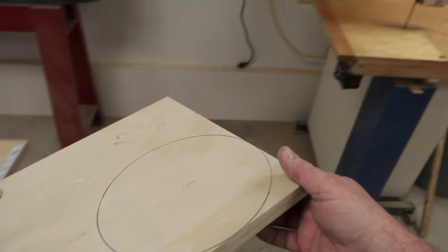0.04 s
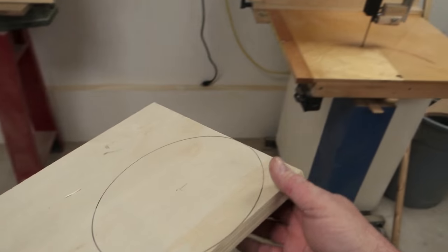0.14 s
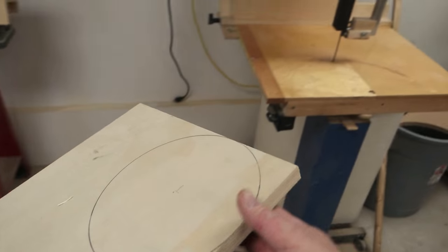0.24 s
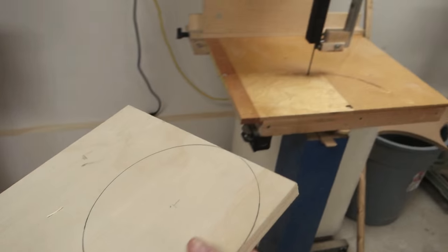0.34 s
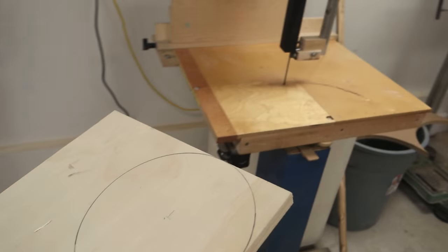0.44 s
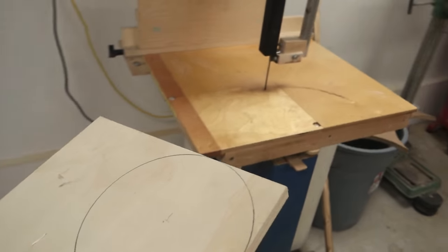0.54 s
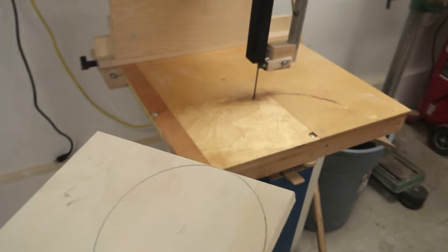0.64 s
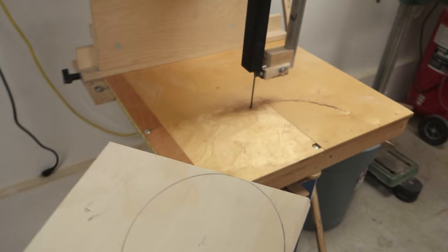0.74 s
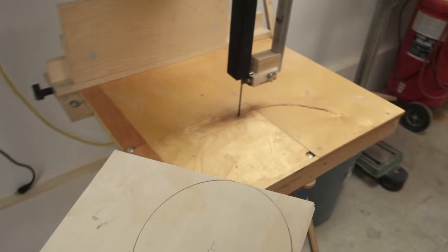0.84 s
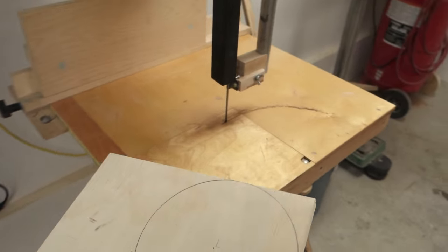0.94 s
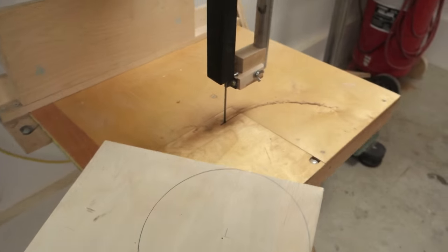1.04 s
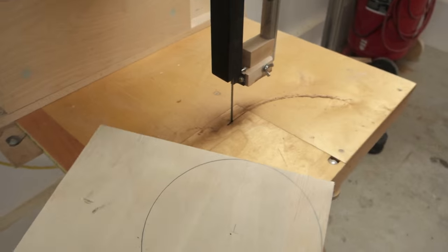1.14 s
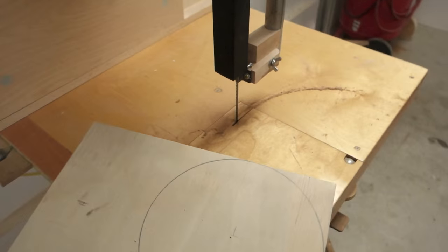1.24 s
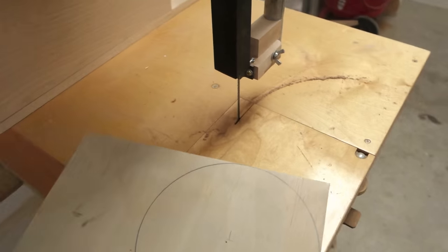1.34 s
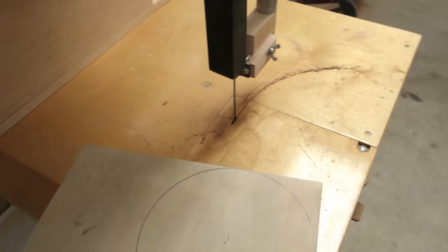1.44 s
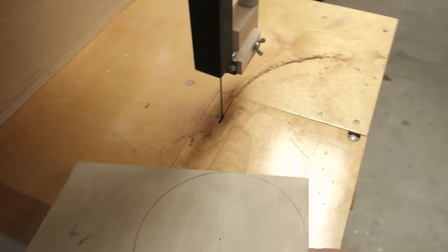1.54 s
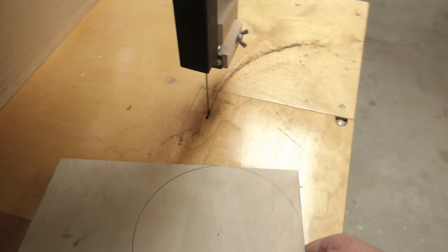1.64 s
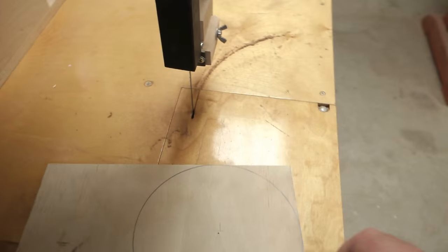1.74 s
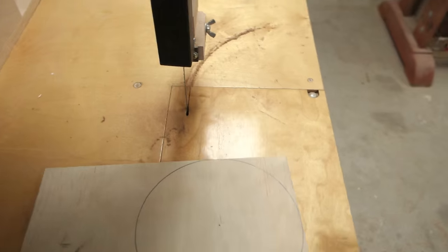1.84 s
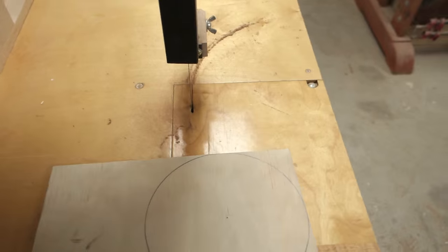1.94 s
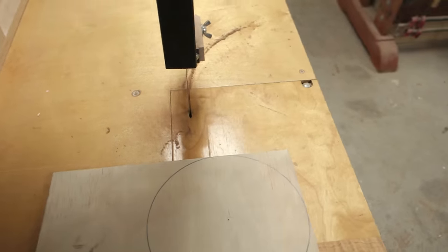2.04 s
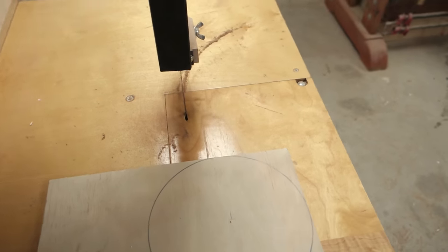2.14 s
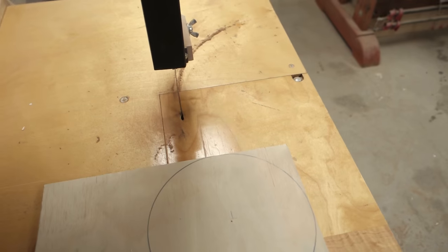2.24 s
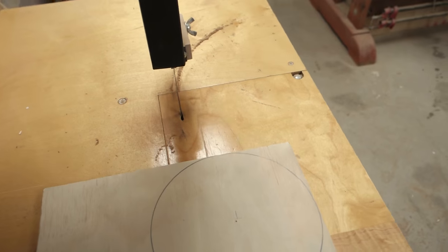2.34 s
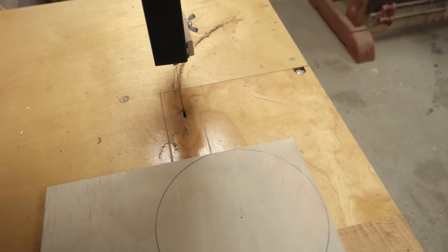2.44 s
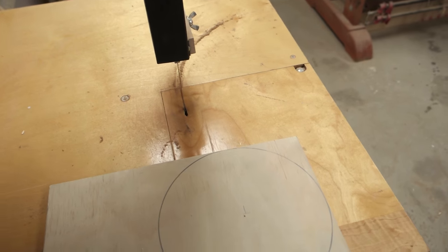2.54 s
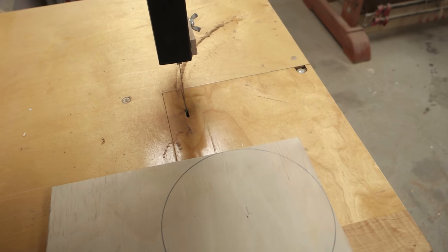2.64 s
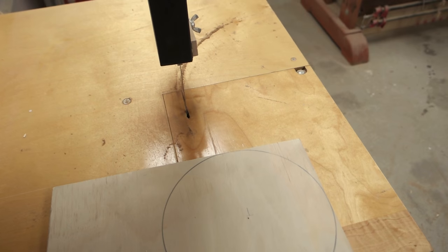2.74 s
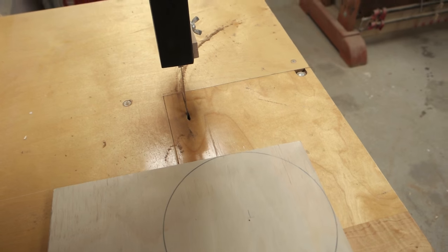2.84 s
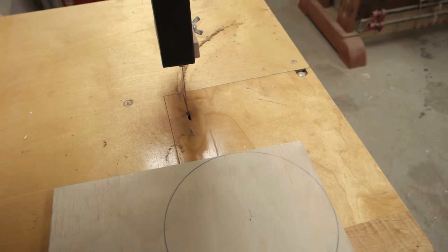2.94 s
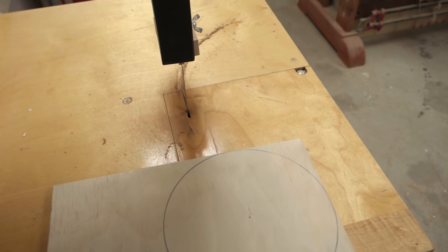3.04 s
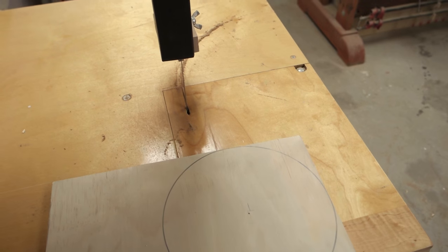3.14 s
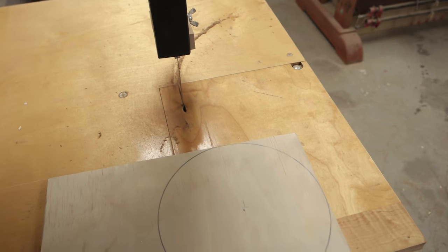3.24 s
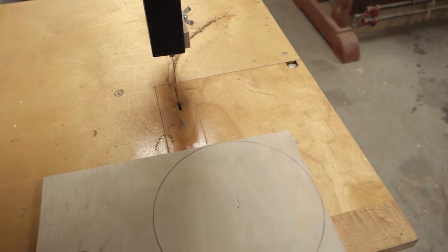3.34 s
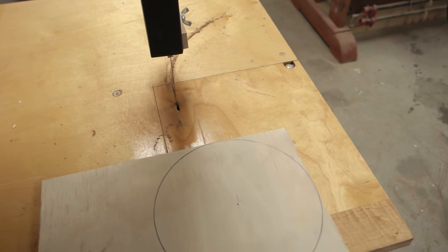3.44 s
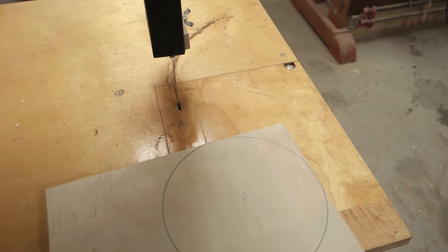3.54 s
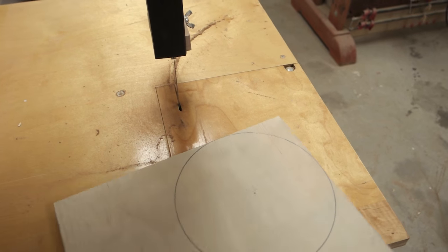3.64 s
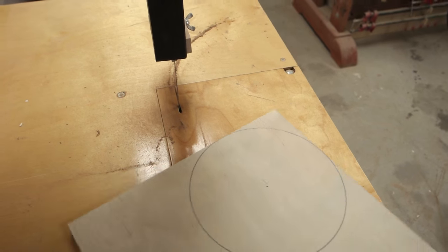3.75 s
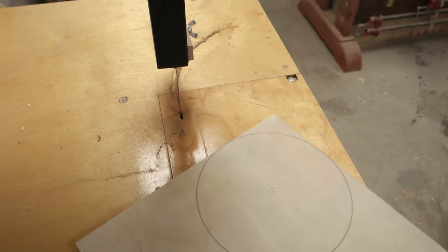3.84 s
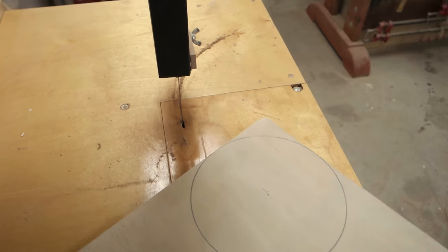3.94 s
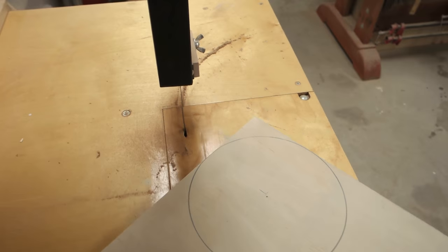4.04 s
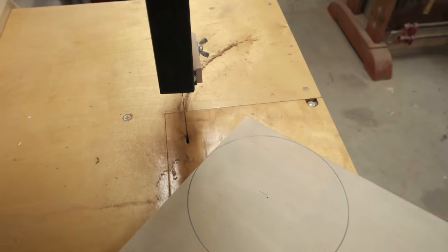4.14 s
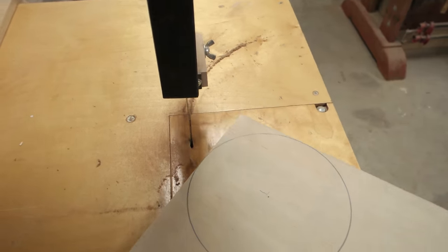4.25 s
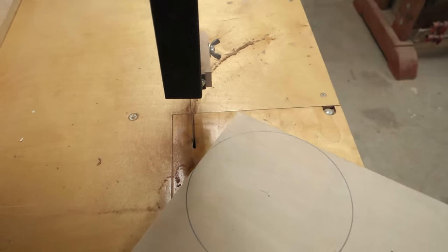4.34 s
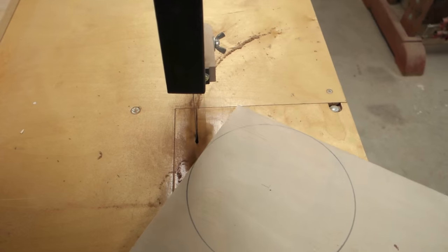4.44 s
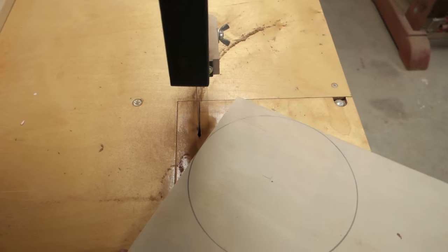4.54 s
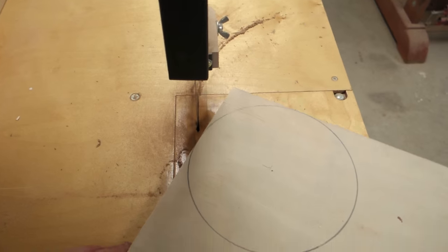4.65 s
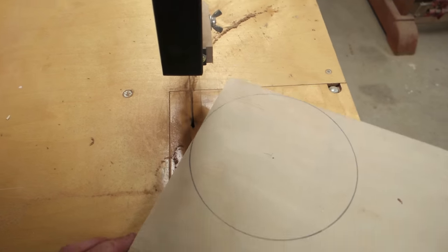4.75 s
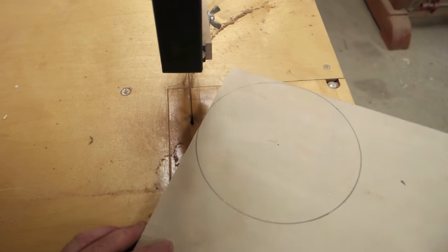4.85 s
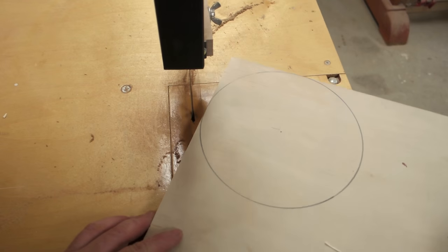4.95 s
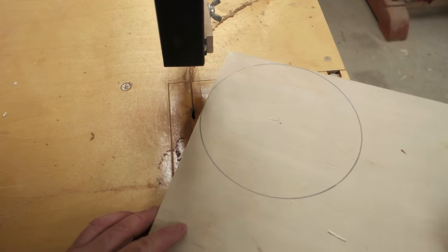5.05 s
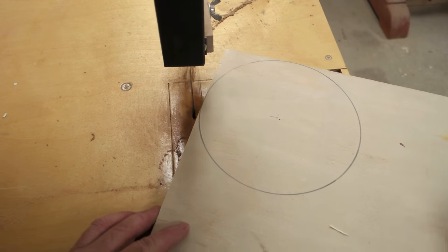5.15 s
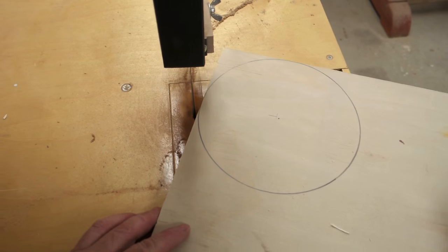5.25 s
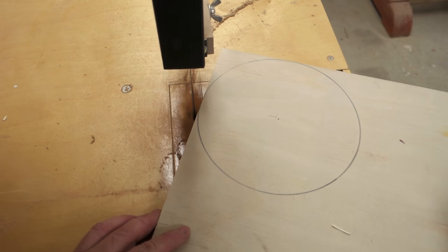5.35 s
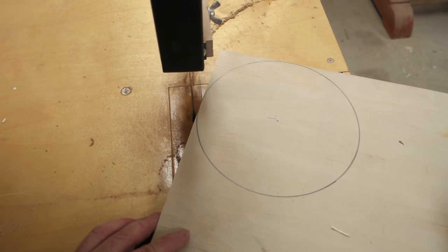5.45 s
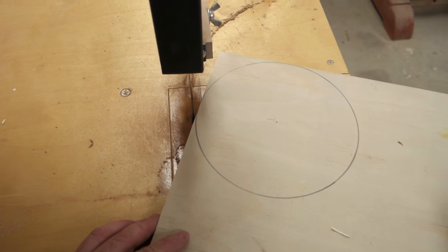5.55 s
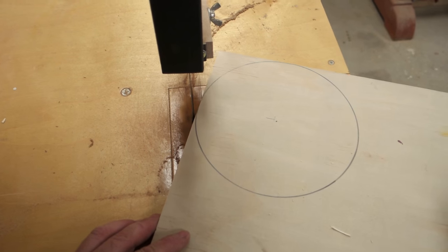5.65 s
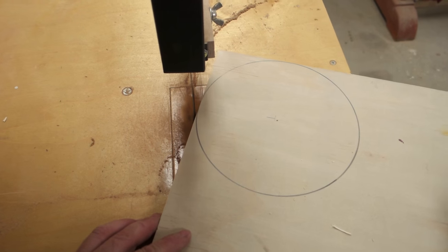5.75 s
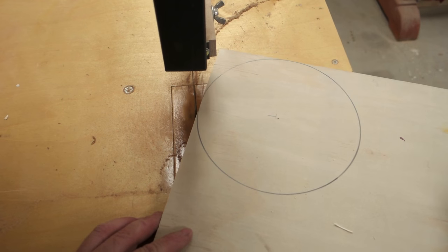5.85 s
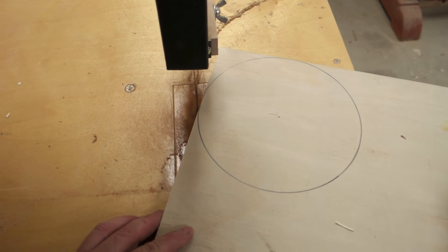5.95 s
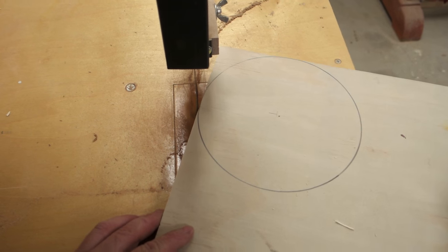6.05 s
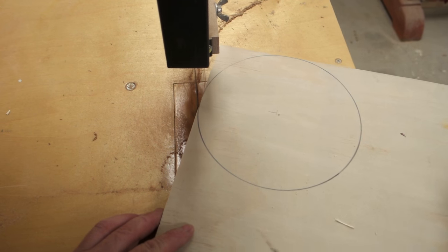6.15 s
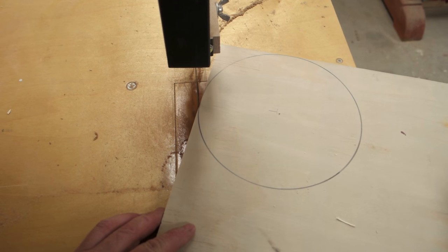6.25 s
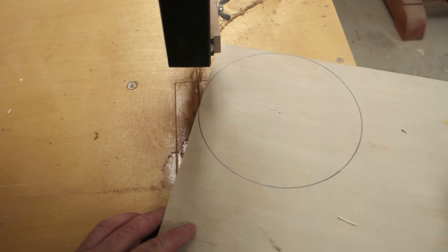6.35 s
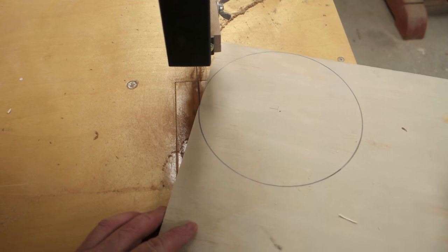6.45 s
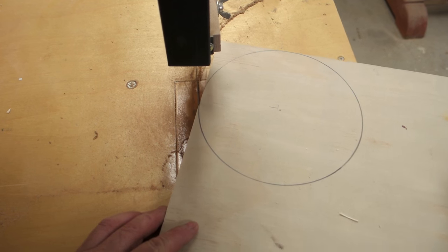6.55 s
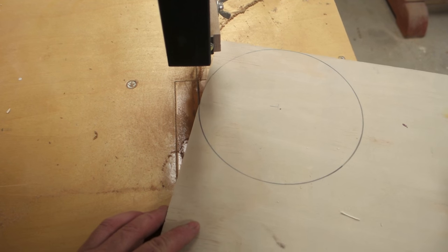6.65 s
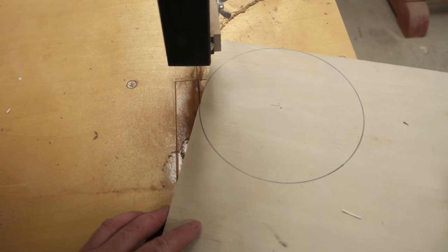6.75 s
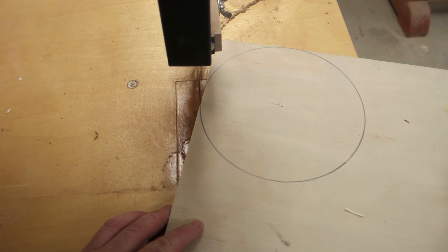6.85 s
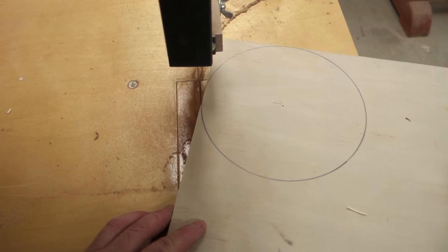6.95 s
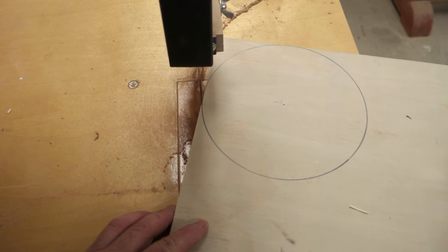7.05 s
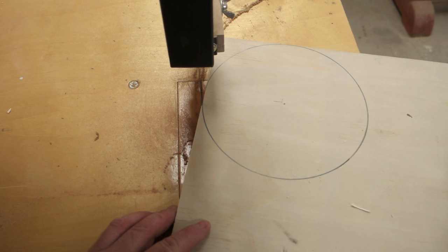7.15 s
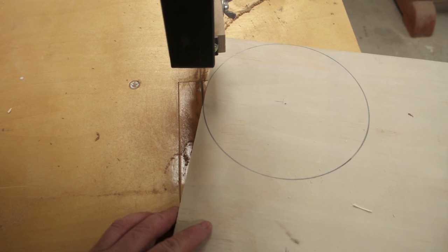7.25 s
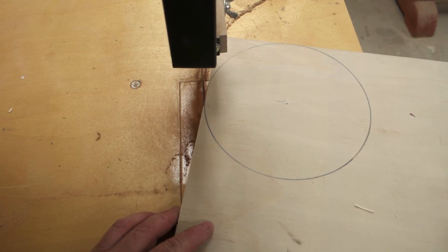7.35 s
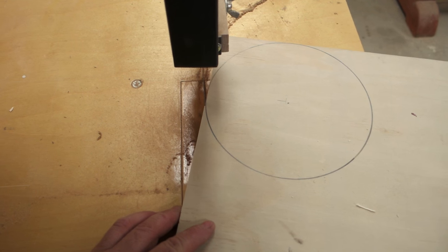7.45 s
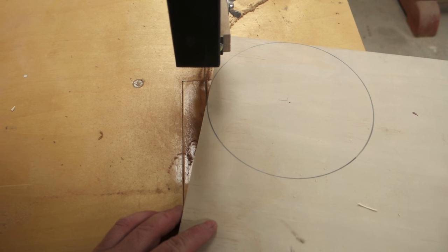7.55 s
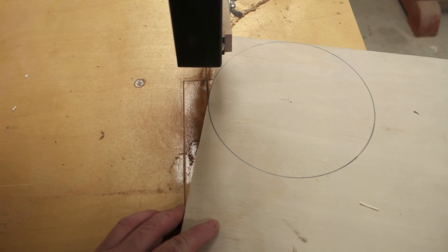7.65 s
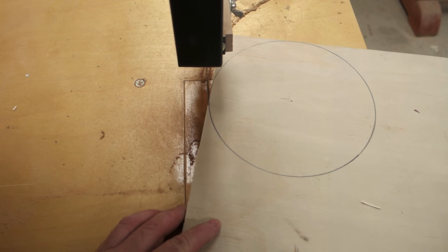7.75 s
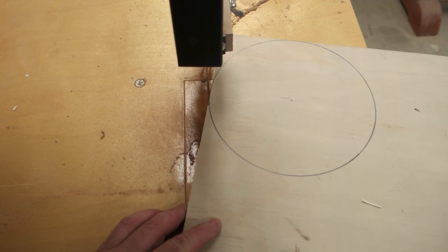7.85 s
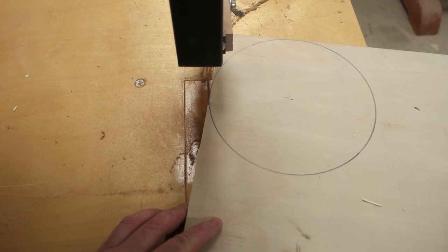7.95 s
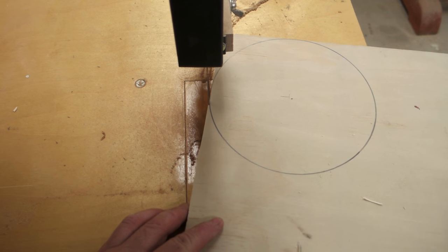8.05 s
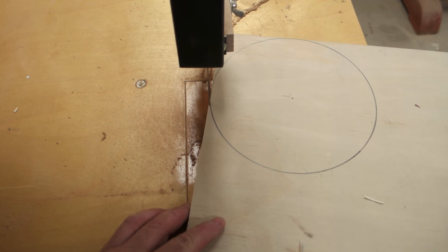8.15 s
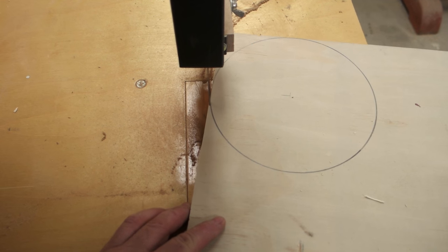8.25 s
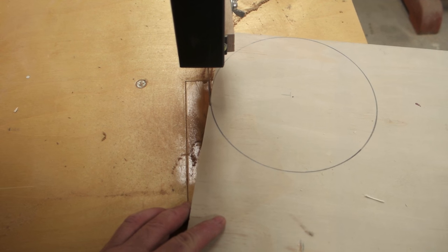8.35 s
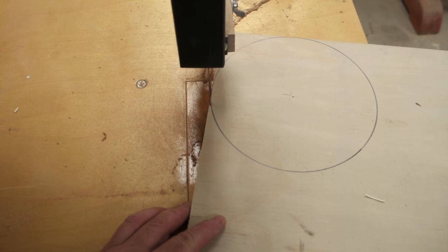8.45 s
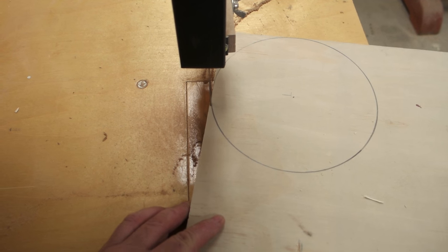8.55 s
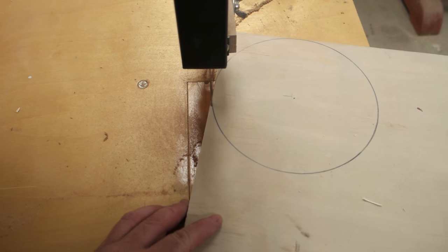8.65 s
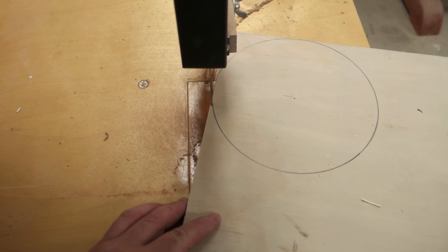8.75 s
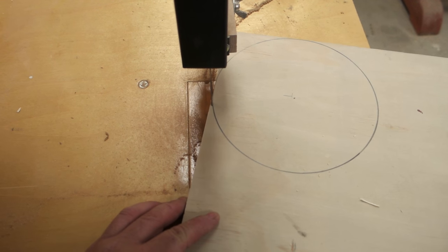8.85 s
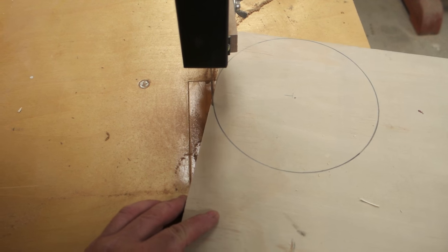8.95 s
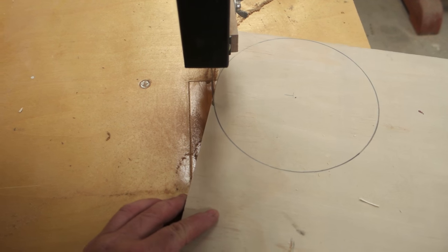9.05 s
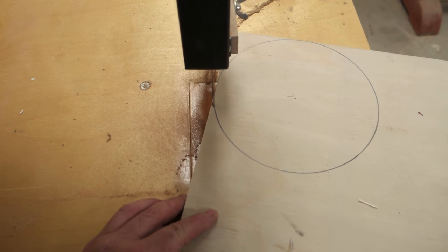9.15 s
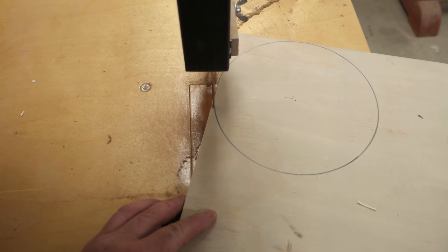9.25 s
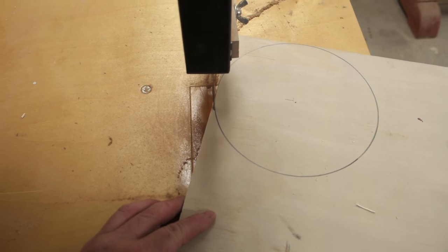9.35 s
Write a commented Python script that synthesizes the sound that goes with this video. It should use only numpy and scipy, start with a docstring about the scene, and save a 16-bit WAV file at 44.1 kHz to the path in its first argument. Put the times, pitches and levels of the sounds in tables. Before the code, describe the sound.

In a small workshop, close and nearly mono, a hand softly rubs a plywood board. It clacks onto a wooden table, slides and settles. A switch snaps, a motor shudders and climbs to speed, and the band saw rumbles and hisses with a regular brushing pulse. Then teeth rasp into wood and a high, slightly rough whine swells strongly before easing a little.

```python
"""A plywood board is rubbed and bumped (filtered noise), knocks on a band saw's table (struck modes), slides
and settles. The switch snaps (struck modes), the motor shudders up to speed (drifting sines), and the free
blade runs with rumble, rattle and hiss (shaped noise), its weld brushing the guides once a lap. Then the teeth
bite: tooth-gated noise rasps, multiples of the tooth beat whine, blade modes ring and squeal. A small workshop
answers the knocks and the switch; the two channels differ only faintly."""
import sys
import numpy as np
from scipy import signal
from scipy.fft import rfft, irfft, next_fast_len
from scipy.io import wavfile
from scipy.ndimage import uniform_filter1d, map_coordinates

SR = 44100
rng = np.random.default_rng(int(sys.argv[2]) if len(sys.argv) > 2 else 0)


def master(y):
    """Save y as 16-bit WAV."""
    cut = np.clip(np.atleast_2d(y).T, -1, 1)
    pcm = np.round(cut * 32767)  # scale
    wavfile.write(sys.argv[1], SR, pcm.astype(np.int16))


N = 414099

# Still air of the shop. Each row: frequency in Hz, relative level in dB per Hz.
STILL_AIR_SPECTRUM = [(12, -35), (20, 0.5), (64, 1.5), (353, -9.5), (599, -15), (770, -9), (910, -15.5),
                      (1680, -21.5), (6060, -27), (14400, -34), (15600, -32)]
# Workshop reverberation. Each row: frequency in Hz, t60 in seconds.
SHOP_T60 = [(100, 0.56), (500, 0.5), (2000, 0.48), (10000, 0.32)]

# Strokes of hand and table over the board.
# Each row: start in seconds, length in seconds, hiss in dB, board tone in dB (both before a common trim).
STROKES = [(0.0, 0.23, -68, -71.5), (0.247, 0.21, -64, -85), (0.52, 0.21, -64.5, -67),
           (1.057, 0.06, -62, -65), (1.15, 0.31, -73, -74), (1.472, 0.53, -65.5, -63),
           (1.907, 0.14, -50.5, -55), (1.994, 0.18, -49, -61), (2.257, 0.065, -65, -58.5),
           (2.519, 0.13, -71.5, -68), (2.757, 0.13, -73.5, -69.5), (3.006, 0.3, -74.5, -68.5)]
# Board edge scuffing in passing. Each row: start in seconds, level in dB.
SCUFFS = [(1.081, -58.5), (1.156, -55)]
# Wood grain sliding. Each row: frequency in Hz, relative level in dB per Hz.
GRAIN_SPECTRUM = [(880, -18), (1500, -7.5), (2120, -7), (2430, -7), (3120, -7), (3400, -6.5), (5950, -7),
                  (12100, -24), (15000, -43)]
# Colours of a hand on the veneer. Each row: frequency in Hz, half width in Hz, relative level in dB.
VENEER_MODES = [(1480, 30, 5), (2510, 200, -2), (3590, 120, -3), (4670, 110, -0.5), (5760, 170, -1)]
# Board sounding as it is rubbed. Each row: frequency in Hz, half width in Hz, relative level in dB.
RUBBED_BOARD_MODES = [(310, 55, 0.5), (506, 43, -5), (622, 24, 8.5), (875, 45, 1.5), (1187, 50, 1),
                      (1390, 36, -0.5), (1710, 80, -15.5), (2160, 30, -5.5), (2320, 40, -5), (2540, 40, -3),
                      (2740, 20, -5.5), (2970, 30, -2)]
# Fingers shift and bump the board. Each row: start in seconds, level in dB.
BUMPS = [(0.137, -58), (0.504, -59), (0.544, -60), (0.609, -61), (0.754, -59), (1.367, -65), (2.6, -60),
         (3.13, -63)]
# Board edge singing in one range of its modes.
# Each row: middle in seconds, half length in seconds, level in dB, centre in Hz.
EDGE_SCRAPES = [(1.184, .03, -59, 1810), (1.52, 0.09, -65, 1880), (2.309, 0.031, -61.5, 2940)]

# Board meeting the table; softer contacts are duller. Each row: start in seconds, level in dB,
# thud and crack in dB relative to it (before trims), tilt in dB per octave, flatness (0 corner, 1 flat).
KNOCKS = [(1.631, -28.5, -22.5, -32, -6, 0.25), (1.763, -17.5, -29, -15.5, -.5, .02),
          (1.781, -19, -25, -10.5, 2, .05), (1.799, -25.5, -20.5, -22, -2, .2),
          (1.918, -15.5, -25, -27, 0, 1), (1.935, -24, -22, -37, -2.5, .75)]
# Board on the table. Each row: frequency in Hz, relative dB on a corner, relative dB flat, t60 in seconds.
STRUCK_BOARD_MODES = [(284.5, 2.5, -3.5, 0.19), (315, -7, -5, 0.14), (349, 0, -4, .14),
                      (386, -5, -7.5, 0.1), (417, -5, -4.5, 0.14), (487, -2.5, -4.5, 0.12),
                      (719, -5, 5, 0.09), (862, -4, 0, 0.12), (931, -7.5, 0, 0.12), (1023, -14, 1, 0.076),
                      (1258, -4.5, -2.5, 0.1), (1360, -1.5, -9, 0.1), (1590, -3.5, -13, 0.12),
                      (1730, -5, -11.5, 0.086), (1900, -7, -14.5, .11), (2080, -12.5, -21.5, 0.081),
                      (2460, -12.5, -15.5, .09), (2685, -10, -19.5, 0.08)]
# Dense higher modes of board and table. Each row: frequency in Hz, relative level in dB per Hz.
CLACK_SPECTRUM = [(130, -26), (220, -4.5), (300, 4.5), (420, 4.5), (600, -6), (750, -4), (1250, -5.5),
                  (1700, -8), (2700, -20.5), (3200, -30), (7000, -39.5), (12000, -75)]

# Power switch. Each row: start in seconds, level in dB.
CLICKS = [(3.217, -28.5)]
# Switch box. Each row: frequency in Hz, relative level in dB, t60 in seconds.
SWITCH_BOX_MODES = [(637, 0, 0.12), (1000, 0, 0.16), (1135, 3, 0.13), (1190, 0, 0.078), (1830, -3, 0.11),
                    (2100, -6, .08), (3540, -2, 0.091), (4170, -10, 0.05)]
# Snap of the switch. Each row: frequency in Hz, relative level in dB per Hz.
SNAP_SPECTRUM = [(240, -35), (400, -1.5), (1160, -11), (3150, -12), (3550, -5), (3830, -17), (7030, -21),
                 (15000, -37)]

# Spin-up. Each row: time in seconds, share of full speed.
SPIN_UP = [(3.22, .3), (3.4, .5), (3.68, .68), (3.85, .85), (4.08, .87), (4.27, 1)]
# Mains hum. Each row: frequency in Hz, dB while starting, dB running,
# dB added by the pull-in surge, dB added by the cut.
MAINS_HUM = [(119, -55, -44, 9, 1.5), (240, -40.5, -44, 12.5, 4)]
# Shaft, pulley and wheel tones. Each row: frequency in Hz, level in dB, both at full speed.
SHAFT_TONES = [(30, -54), (45.5, -62), (64.4, -51.5), (90, -45), (150, -49), (210, -54.5), (303, -48.5),
               (360, -51.5), (373, -53), (392, -57), (486, -55), (543, -53.5)]
# Wheel rumble. Each row: frequency in Hz, relative level in dB per Hz.
RUMBLE_SPECTRUM = [(22, -35), (40, -18), (52, 7), (66, 4.5), (85, 12.5), (105, -4), (135, -2), (175, 1),
                   (220, -8), (400, -71)]
# Rumble swelling as the machine settles. Each row: middle in seconds, half length in seconds, added dB.
RUMBLE_SWELLS = [(4.25, 0.18, 5.5), (5.117, .15, 5)]
# Frame rattle. Each row: frequency in Hz, relative level in dB per Hz.
RATTLE_SPECTRUM = [(110, -61), (180, -10.5), (239, -2), (307, -2), (334, -10), (371, -5.5), (541, -6),
                   (600, -8.5), (710, -6), (884, -13), (2200, -25.5), (2860, -34), (4840, -120)]
# Blade hiss in its guides. Each row: frequency in Hz, relative level in dB per Hz.
GUIDE_SPECTRUM = [(880, -8.5), (1500, -0.5), (1580, -10.5), (1770, -1.5), (2240, -4), (2450, -3.5),
                  (3160, -7), (3840, -9.5), (4200, -11), (5310, -4), (7270, -11), (8930, -17), (12600, -19),
                  (14600, -35), (15600, -23)]
# Free blade in its guides. Each row: frequency in Hz, half width in Hz, relative level in dB.
GUIDE_MODES = [(1008, 10, 6.5), (1231, 10, 5.5), (1747, 17, 4.5), (2100, 12, 2), (2320, 28, 0),
               (2470, 7.9, 7), (2522, 9, 6.5), (2606, 30, -1.5), (2864, 23, -4), (3820, 39, 0),
               (5300, 24, 2), (5485, 50, 0.5)]
# Short bursts of rattle and hiss while the blade runs free, most near weld passes.
# Each row: middle in seconds, half length in seconds, rattle in dB, hiss in dB.
FREE_RUN_BURSTS = [(3.87, 0.085, -62, -48), (4.533, 0.02, -49, -58), (5.026, 0.025, -40, -53),
                   (5.455, .02, -45, -55), (5.698, .02, -44, -52)]

# Tooth rate at full speed, sagging under the cut. Each row: time in seconds, teeth per second.
TOOTH_RATE = [(6.3, 822), (6.4, 819.5), (7.1, 818.3), (7.7, 817.2), (8.3, 816.2), (9.0, 816), (9.39, 816.8)]
# Tones of the even tooth beat. Each row: multiple of the tooth rate, relative level in dB.
TOOTH_ORDERS = [(2, -9.5), (3, -7.5), (4, -13.5), (6, -13.5), (7, 1), (8, -5.5), (10, -35), (15, -35),
                (17, -28), (18, -30)]
# Overtones of the whine. Each row: multiple of the tooth rate, relative level in dB.
WHINE_ORDERS = [(10, -19.5), (13, -27), (15, -19.5), (17, -34), (18, -37), (19, -42)]
# Singing of the cut as the feed varies. Each row: time in seconds, whine level in dB before trim.
WHINE_LEVEL = [(6.48, -53), (6.57, -49.5), (7.0, -45), (7.37, -34), (7.52, -36), (7.57, -32), (7.78, -27),
               (8.29, -25.5), (8.68, -27.5), (8.8, -30), (9.33, -33)]
# Brief swells of single multiples of the tooth beat; only those during the cut are heard.
# Each row: multiple of the tooth rate, middle in seconds, half length in seconds, added dB.
ORDER_SWELLS = [(7, 6, 0.13, 5), (3, 7.1, 0.073, 6.5), (7, 7.11, .04, 3.5), (7, 7.36, .11, 3),
                (7, 7.58, .03, 7.5), (6, 7.22, .12, 9), (3, 6.84, 0.29, 3.5), (17, 7.22, .15, 6)]
# Chips torn out. Each row: frequency in Hz, relative level in dB per Hz.
RASP_SPECTRUM = [(400, -22), (750, -16), (1100, -12), (2000, -10.5), (2500, -11), (3400, -10), (4100, -7),
                 (5400, -4), (6200, -9), (7200, -14.5), (8800, -15.5), (9600, -19.5), (12400, -19.5),
                 (14000, -26), (15700, -39)]
# Blade and board modes kept ringing by the cut. Each row: frequency in Hz, half width in Hz, relative dB.
BLADE_MODES = [(370, 14, -7), (950, 12, -12), (1001, 18, -6), (1055, 8, -10), (1200, 8, -10), (1319, 6, -3),
               (1475, 7, -8), (1620, 10, -8), (1825, 14, -12), (1895, 12, -9), (1985, 25, -12),
               (2400, 45, -10), (2449, 12, -5), (2606, 10, -6), (2665, 10, -10), (2837, 22, -10),
               (3025, 8, -2), (3205, 20, -10), (3478, 16, -9), (3784, 12, -5), (3835, 14, -7),
               (3935, 20, -7), (4296, 9, -4), (4506, 7, -5), (4790, 45, -8), (4858, 12, -4), (4905, 25, -7),
               (5136, 10, -9), (5351, 40, -7)]
# Strongest blade modes, singing steadily. Each row: frequency in Hz, relative level in dB.
SQUEAL_MODES = [(4716, 0), (4786, -7), (4899, -6)]

TOP_HZ = 15780
NEAR_GAIN, NEAR_DELAY_S = 0.1, .028  # strength of each early echo; latest possible arrival
STROKE_ATTACK_S, STROKE_RELEASE_T60_S = 0.044, 0.39
SETTLE_S, SETTLE_DB = 2.238, -42.5  # board sinks flat on the table
CLACK_DB = -9  # dense higher modes under the main ones
SLAP_DB, SLAP_T60_S = -5, .02  # bare slap of wood on wood
SWITCH_ON_S, PULL_IN_S = 3.22, 4.03  # motor starts; start winding drops out
SURGE_S, SURGE_WIDTH_S = 4.14, 0.091  # hum swells as the motor pulls in
FRAME_SHAKES_S, FRAME_BUILD_S = 3.24, .055  # frame takes up the motor's shaking
RUMBLE_DB, JOLT_DB, JOLT_S, JOLT_WIDTH_S = -43, 9.5, 3.34, 0.091  # wheels, and their jolt on starting
RATTLE_DB, RATTLE_SPEED_DB = -42, 1  # base at full speed; gain per unit of speed
HISS_DB, HISS_SPEED_DB, HISS_LOAD_DB = -42.5, 22.5, 3  # same for the hiss; gain under load
HISS_WAVER_DB = .9  # blade wanders in its guides
BLADE_TEETH, WELD_PASS_S = 193, 8.262  # teeth round the band; one moment with the weld in the kerf
BRUSH_DB, BRUSH_FADE_DB_PER_S = -35, 2.5  # first weld brush; fall as the blade settles
BRUSH_LAG_S, BRUSH_ATTACK_S, BRUSH_T60_S = 0.0022, 0.017, 0.37
TICKS_PER_S, TICK_DB, TICK_T60_S = 70, -46.5, 0.019  # mean rate of loose guards and guides
BITE_S, SINK_S = 6.39, 1.41  # teeth touch the board; time to full depth
RASP_DB, RASP_DEPTH_DB = -30, 11.5  # at full depth; gain since first touch
BEAT_START_S = 6.445  # teeth settle into an even beat
BEAT_DB, BEAT_BUILD_DB, BEAT_BUILD_S = -37, 7.5, 0.83  # beat builds as the teeth enter
BEAT_DAMP_DB, BEAT_DAMP_AT_S, BEAT_DAMP_S = 7, 7.04, 0.77  # wood closes round the blade and damps it
FLUTTER_HZ, FLUTTER_DEPTH = 21, .5  # lightly loaded blade swings
RING_DB, RING_AT_S, RING_BUILD_S = -3.5, 6.64, 0.85  # relative to the rasp; blade buried
SQUEAL_DB, SQUEAL_BUILD_DB, SQUEAL_FULL_S = -35.5, 27, 8.4  # full level; gain since touch; when full


def amp(db):
    """Decibels to gain."""
    return 10 ** (np.asarray(db) / 20)


def unit(x):
    """x at rms 1."""
    return x / np.sqrt(np.mean(x ** 2) + 1e-20)


def clock():
    """Time of each sample in seconds."""
    return np.arange(N) / SR


def along(points, hz):
    """(Hz, value) points read on a log axis."""
    f, v = np.transpose(points)
    return np.interp(np.log(hz + 1), np.log(f + 1), v)


def curves(rows):
    """One value per sample for each column after the time."""
    s, *cols = np.transpose(rows)
    return [np.interp(clock(), s, c) for c in cols]


def ramp(start_s, length_s):
    """Linear rise from 0 to 1."""
    return np.clip((clock() - start_s) / length_s, 0, 1)


def swell(middle_s, width_s):
    """Smooth bump of height 1."""
    return np.exp(-((clock() - middle_s) / width_s) ** 2)


def decay(start_s, t60_s):
    """1 ms rise, then an exponential fall."""
    age = np.maximum(clock() - start_s, 0)
    rise = np.minimum(age / .001, 1)
    return np.sin(rise * np.pi / 2) ** 2 * amp(-60 * np.minimum(age / t60_s, 3))


def wobble(rate_hz):
    """Smooth random curve through rate_hz random knots a second."""
    knots = rng.standard_normal(int(N * rate_hz / SR) + 4)
    return map_coordinates(knots, [clock() * rate_hz])


def filtered(x, response):
    """x times a response of frequency."""
    m = next_fast_len(N + SR // 2)
    return irfft(rfft(x, m) * response(np.fft.rfftfreq(m, 1 / SR)), m)[..., :N]


def coloured(x, spectrum):
    """x shaped by a spectrum, at rms 1."""
    return unit(filtered(x, lambda hz: amp(along(spectrum, hz))))


def noise(spectrum):
    """Noise of rms 1 with this spectrum."""
    return coloured(rng.standard_normal(N), spectrum)


def resonant(modes):
    """Noise of rms 1 ringing in narrow resonances."""
    peaks = lambda f: sum(amp(db) / (1 + ((f - hz) / width) ** 2) for hz, width, db in modes)
    return unit(filtered(rng.standard_normal(N), peaks))


def tone(hz, unsteady, rate_hz):
    """Sine of rms 1 drifting in level and phase; hz may be a curve."""
    drift = 1 + unsteady * (wobble(rate_hz) + 1j * wobble(rate_hz))
    return unit(np.real(drift * np.exp(2j * np.pi * np.cumsum(hz * np.ones(N)) / SR)))


def ring(start_s, modes):
    """Modes struck at start_s, at new strengths for each blow, at peak 1."""
    t = np.arange(SR // 2) / SR
    contact = np.sin(np.minimum(t / 0.00083, 1) * np.pi / 2) ** 2
    strike = np.zeros(len(t))
    for hz, db, t60_s in modes:
        fall = amp(db + rng.normal(0, 1.4) - 60 * t / t60_s)
        strike += contact * fall * np.sin(2 * np.pi * (hz * t + rng.random()))
    return np.pad(strike / np.abs(strike).max(), (round(start_s * SR), N))[:N]


def nearby(x):
    """Weak early echoes off table, frame and walls ripple a steady noise."""
    echoes = rng.random((8, 2))

    def response(hz):
        ripple = sum(np.sign(side - .5) * np.exp(-2j * np.pi * hz * NEAR_DELAY_S * when)
                     for when, side in echoes)
        return 1 + NEAR_GAIN * ripple
    return unit(filtered(x, response))


def shop(x):
    """Workshop reverberation as decaying noise: the treble dies first."""
    hz, t, z = signal.stft(rng.standard_normal(SR // 2), SR, nperseg=256)
    fall = amp(-60 * t / along(SHOP_T60, hz)[:, None])
    tail = signal.istft(z * fall, SR, nperseg=256)[1]
    return signal.fftconvolve(x, np.pad(tail / np.linalg.norm(tail), (200, 0)))[:N]


def depth():
    """How far the blade is buried, 0-1: the load on the machine."""
    return ramp(BITE_S, SINK_S)


def band_laps():
    """Laps travelled by the blade; whole numbers fall where the weld passes the table."""
    (speed,), (rate,) = curves(SPIN_UP), curves(TOOTH_RATE)
    laps = np.cumsum(speed * rate) / SR / BLADE_TEETH
    return laps - np.interp(WELD_PASS_S, clock(), laps)


def still_air():
    """Steady shaped noise of the quiet shop."""
    return amp(-69.0) * noise(STILL_AIR_SPECTRUM)


def rubbing():
    """Wood grain hisses under hand and over table; the board's resonances sound along."""
    hiss_power, tone_power = np.zeros(N), np.zeros(N)
    for start_s, length_s, hiss_db, tone_db in STROKES:
        release = np.clip((clock() - start_s - length_s) / STROKE_RELEASE_T60_S, 0, 2)
        stroke = ramp(start_s, STROKE_ATTACK_S) * amp(-60 * release)
        hiss_power += (amp(hiss_db) * stroke) ** 2
        tone_power += (amp(tone_db) * stroke) ** 2
    grain = amp(0.8 * wobble(120) + 1.1 * wobble(13))
    surface = unit(nearby(noise(GRAIN_SPECTRUM)) + amp(-6.5) * resonant(VENEER_MODES))
    hiss = np.sqrt(hiss_power) * surface
    body = np.sqrt(tone_power) * resonant(RUBBED_BOARD_MODES)
    catches = sum(amp(db) * decay(s, 0.36) for s, db in SCUFFS)
    scuffs = catches * noise([(300, -22), (700, 4), (1300, 5.0), (2500, -3.0), (3300, -7),
                              (7000, -11), (14000, -28.5)])
    return grain * (amp(-2.5) * (hiss + body) + scuffs)


def handling():
    """Fingers bump the board, its edge sings in bands of its modes, and it settles with a soft thump."""
    pats = sum(amp(db) * ramp(s, 0.011) * decay(s, 0.14) for s, db in BUMPS)
    bumps = pats * noise([(60, -14), (170, -1), (330, 2), (600, 2), (800, -13), (1200, -20), (3000, -40)])
    wood = resonant(RUBBED_BOARD_MODES)
    scrapes = np.zeros(N)
    for middle_s, half_s, db, hz in EDGE_SCRAPES:
        band = unit(filtered(wood, lambda f: 1 / (1 + ((f - hz) / 450) ** 4)))
        scrapes += amp(db) * swell(middle_s, half_s) * band
    thump = resonant([(78, 12, 5), (132, 23, -1.5), (275, 21, -0.5)])
    thump = thump * ramp(SETTLE_S, 0.014) ** 2 * decay(SETTLE_S + 0.01, 0.31)
    return bumps + scrapes + amp(SETTLE_DB) * thump


def knocks():
    """Each landing rings the board, cracks its edge and thuds the table; flatness weights the modes."""
    clack = noise(CLACK_SPECTRUM)
    thud = noise([(40, -37), (65, 2.5), (90, -2.0), (150, -10.0), (230, -13), (1000, -78)])
    edge = noise([(800, -40.5), (2500, 16), (6000, -9.5), (9000, -34), (14000, -46)])
    out = np.zeros(N)
    for s, db, thud_db, crack_db, tilt_db, flat in KNOCKS:
        modes = [(hz, corner_db + np.clip(flat, 0, 1) * (flat_db - corner_db), t60_s)
                 for hz, corner_db, flat_db, t60_s in STRUCK_BOARD_MODES]
        clack_env = amp(CLACK_DB) * decay(s, 0.1) + amp(SLAP_DB) * decay(s, SLAP_T60_S)
        wood = amp(-3) * ring(s, modes) + clack * clack_env
        wood = filtered(wood, lambda hz: amp(tilt_db * np.log2(np.hypot(hz, 300) / 700)))
        table = amp(thud_db - 1.5) * thud * decay(s, 0.34)
        crack = amp(crack_db - 2.0) * edge * decay(s, 0.051)
        out += amp(db) * (wood + table + crack)
    return out + amp(-7) * shop(out)


def clicks():
    """The power switch snaps over and rings the modes of its box."""
    snap = noise(SNAP_SPECTRUM)
    out = sum(amp(db) * (ring(s, SWITCH_BOX_MODES) + amp(-10.5) * snap * decay(s, 0.15))
              for s, db in CLICKS)
    return out + amp(-9) * shop(out)


def motor():
    """Mains hum starts at switch-on; shaft tones glide with speed, growing as its square."""
    speed, = curves(SPIN_UP)
    pulled_in, surge = ramp(PULL_IN_S - .1, 0.27), swell(SURGE_S, SURGE_WIDTH_S)
    hum = np.zeros(N)
    for hz, start_db, run_db, surge_db, load_db in MAINS_HUM:
        level_db = start_db + (run_db - start_db) * pulled_in + surge_db * surge + load_db * depth()
        hum += amp(level_db) * tone(hz, unsteady=0.11, rate_hz=6.4)
    tones = sum(amp(db) * tone(hz * speed, unsteady=0.33, rate_hz=7) for hz, db in SHAFT_TONES)
    shaft = speed ** 2 * ramp(3.6, 0.88) * tones
    # the start winding growls until it is switched out
    growl = amp(-42.0) * resonant([(304, 19, 2.5), (335, 11, -8), (353.6, 5.4, 9.5), (480, 17, 0.0)])
    growl = growl * ramp(3.25, 0.015) * (1 - ramp(3.81, 0.26))
    # the belt shudders as it takes up the load
    shudder = amp(-30.5) * tone(58.5, unsteady=.2, rate_hz=25) * ramp(3.25, 0.034) * decay(3.3, 0.96)
    # the frame booms as the motor pulls in
    boom = amp(-33.0) * tone(275, unsteady=.2, rate_hz=17)
    boom = boom * ramp(PULL_IN_S, 0.084) * decay(PULL_IN_S, 0.64)
    return (hum + shaft) * ramp(SWITCH_ON_S, 0.036) + growl + shudder + boom


def weld_brushes():
    """Once a lap the weld brushes the guides: a short swell of noise that dies away."""
    laps = band_laps()
    passes_s = np.interp(np.arange(np.ceil(laps[0]), laps[-1]), laps, clock())
    passes_s = passes_s[passes_s > 3.9] + BRUSH_LAG_S
    brushes = np.zeros(N)
    for s in passes_s:
        level_db = BRUSH_DB - BRUSH_FADE_DB_PER_S * (s - passes_s[0]) + rng.normal(0, 0.22)
        brushes += amp(level_db) * ramp(s, BRUSH_ATTACK_S) * decay(s, BRUSH_T60_S)
    return brushes * (noise(GUIDE_SPECTRUM) + amp(1.0) * noise(RATTLE_SPECTRUM))


def running():
    """Wheels rumble, the frame rattles with the shaft and the blade hisses in its guides."""
    speed, = curves(SPIN_UP)
    jolt = swell(JOLT_S, JOLT_WIDTH_S)
    rumble_db = RUMBLE_DB + JOLT_DB * jolt + sum(db * swell(s, half_s) for s, half_s, db in RUMBLE_SWELLS)
    rattle_db = RATTLE_DB + RATTLE_SPEED_DB * (speed - 1) + 3 * jolt
    hiss_db = HISS_DB + HISS_SPEED_DB * (speed - 1) + HISS_LOAD_DB * depth()
    turn = np.sin(2 * np.pi * 30 * clock())
    rumble = amp(rumble_db) * noise(RUMBLE_SPECTRUM)
    # the rattle is dull at first and brightens with speed
    frame = noise(RATTLE_SPECTRUM)
    bright = filtered(frame, lambda hz: hz ** 4 / (hz ** 4 + 600 ** 4))
    rattle = amp(rattle_db + wobble(60)) * (1 + 0.065 * turn) * (frame - 0.23 * (1 - speed) * bright)
    # the blade's resonances fade in during spin-up
    scrape = nearby(noise(GUIDE_SPECTRUM)) + amp(-3.5) * resonant(GUIDE_MODES) * ramp(3.63, 0.34)
    hiss = amp(hiss_db + 0.47 * wobble(90) + HISS_WAVER_DB * wobble(10)) * scrape * (1 + 0.019 * turn)
    return (rumble + rattle + hiss) * ramp(FRAME_SHAKES_S, FRAME_BUILD_S) + weld_brushes()


def ticks_and_bursts():
    """Loose metal ticks at random while the saw runs; short bursts of rattle and hiss join the free blade."""
    speed, = curves(SPIN_UP)
    hits = (rng.random(N) < TICKS_PER_S / SR) * amp(2.8 * rng.standard_normal(N))
    fade = amp(-60 * np.arange(SR // 10) / SR / TICK_T60_S)
    ticking = unit(signal.fftconvolve(hits, fade)[:N])
    ticking = amp(TICK_DB) * ticking * speed ** 3 * ramp(FRAME_SHAKES_S, 0.74)
    metal = noise([(200, -30), (450, 5.5), (750, 0), (1400, -3.5), (2500, -6.5), (3500, -11.5),
                   (7000, -24), (14000, -44)])
    rattle = sum(amp(db) * swell(s, half_s) for s, half_s, db, _ in FREE_RUN_BURSTS)
    hiss = sum(amp(db) * swell(s, half_s) for s, half_s, _, db in FREE_RUN_BURSTS)
    sizzle = noise([(1500, -20), (2600, -7), (4300, -6.5), (5400, 2), (8000, -10), (14000, -22)])
    return metal * (ticking + rattle * amp(1.1 * wobble(150))) + hiss * sizzle


def order_swell_db(multiple):
    """dB that brief swells add to one multiple of the tooth beat."""
    return sum(db * swell(s, half_s) for k, s, half_s, db in ORDER_SWELLS if round(k) == round(multiple))


def tooth_tones(orders, teeth, waver_db, rate_hz):
    """Sines at multiples of the tooth phase, each wavering in level."""
    out = np.zeros(N)
    for k, db in orders:
        level = amp(db + order_swell_db(k) + waver_db * wobble(rate_hz))
        out += np.sqrt(2) * level * np.sin(2 * np.pi * k * teeth)
    return out


def cutting():
    """Each tooth tears out a chip; the fifth multiple of their beat meets a blade resonance and whines."""
    whine_db, = curves(WHINE_LEVEL)
    feed_db = 0.24 * wobble(15)  # the hand pushes unevenly
    rasp_db = RASP_DB + RASP_DEPTH_DB * (depth() - 1) + feed_db
    beat_db = BEAT_DB + BEAT_BUILD_DB * (ramp(BITE_S, BEAT_BUILD_S) - 1) + 0.5 * wobble(12)
    beat_db = beat_db - BEAT_DAMP_DB * ramp(BEAT_DAMP_AT_S, BEAT_DAMP_S)
    # tooth spacing is broken at the weld: once a lap the phase skips and jitters
    laps = band_laps()
    at_weld = np.exp(-((laps - np.round(laps)) / .06) ** 2)
    lap = (np.floor(laps) - np.floor(laps[0])).astype(int)
    skip = uniform_filter1d(np.cumsum(rng.uniform(.5, 1.5, lap[-1] + 1))[lap], size=120)
    jitter = (.003 + .014 * at_weld) * wobble(400) + .007 * wobble(25)
    teeth = BLADE_TEETH * laps + .09 * skip + jitter
    overtones = tooth_tones(TOOTH_ORDERS, teeth, waver_db=1.8, rate_hz=120)
    whine = tooth_tones([(5, 5)], teeth, waver_db=.9, rate_hz=100)
    whine = whine + tooth_tones(WHINE_ORDERS, teeth, waver_db=2.4, rate_hz=50)
    # the whine stutters most until the teeth are fully engaged
    stutter_db = (.6 + 1.6 * (1 - depth())) * wobble(45)
    swing = np.sin(2 * np.pi * FLUTTER_HZ * clock() + .6 * wobble(12))
    whine = whine * (1 + FLUTTER_DEPTH * (1 - ramp(6.9, .4)) * swing)
    whine_gain = amp(whine_db - 1.5 + feed_db + stutter_db + 0.37 * wobble(300))
    tones = amp(beat_db) * overtones + whine_gain * whine
    # tones dip at the weld, come back strongest and sag through the lap
    tones = tones * ramp(BEAT_START_S, .025) * (1 - .8 * at_weld ** 10) * amp(2.5 * (.5 - laps % 1))
    # the same sharp and dull teeth come round on every lap
    sharpness = rng.standard_normal(size=BLADE_TEETH)
    tooth_gain = amp(2 * sharpness[np.floor(teeth).astype(int) % BLADE_TEETH])
    bite = tooth_gain * (1 + 0.24 * np.cos(2 * np.pi * teeth))
    # the weld scrapes through the kerf just after the skip, and the shaft shakes the blade
    scrape = amp(2 * np.exp(-(laps % 1) / .15) + .7 * np.sin(2 * np.pi * 30 * clock()))
    chips = nearby(coloured(bite * rng.standard_normal(N), RASP_SPECTRUM))
    rasp = scrape * chips * np.sqrt(ramp(BITE_S, 0.099))
    # the blade rings, roughly, once it is buried in the board
    roughness = amp(1.5 * wobble(220))
    blade = unit(resonant(BLADE_MODES) * roughness) * ramp(RING_AT_S, RING_BUILD_S)
    return (tones + amp(rasp_db) * (rasp + amp(RING_DB) * blade)) * ramp(BITE_S, .08)


def squeal():
    """The buried blade sings in its strongest modes: drifting sines with a fast random roughness."""
    level_db = SQUEAL_DB + SQUEAL_BUILD_DB * (ramp(BITE_S, SQUEAL_FULL_S - BITE_S) - 1)
    rough = amp(2.2 * wobble(260))
    modes = sum(amp(db) * tone(hz, unsteady=.42, rate_hz=36) for hz, db in SQUEAL_MODES)
    return amp(level_db) * rough * modes * ramp(BITE_S, 0.54)


def scene():
    """Everything near the saw, almost mono; faint reverberation is added opposite in the two channels."""
    board = rubbing() + handling() + knocks()
    machine = clicks() + motor() + running() + ticks_and_bursts()
    cut = cutting() + squeal()
    mid = still_air() + board + machine + cut
    side = amp(-51.5) * shop(mid)
    return np.array([mid + side, mid - side])


def record(dry):
    """Sharp low-pass: nothing at or above TOP_HZ."""
    return filtered(dry, lambda hz: hz < TOP_HZ)


dry = scene()
out = record(dry)
master(out)
```